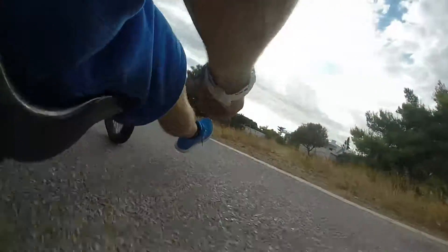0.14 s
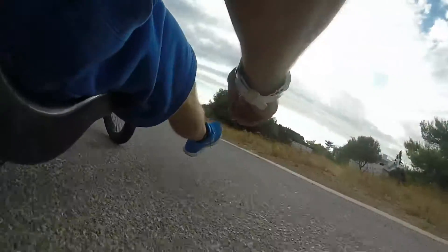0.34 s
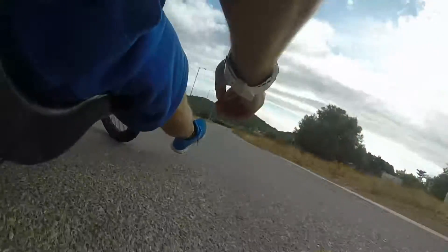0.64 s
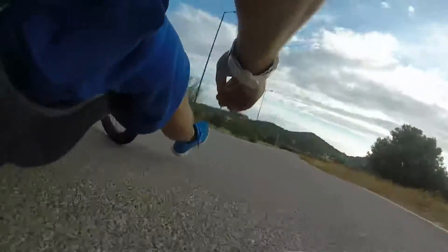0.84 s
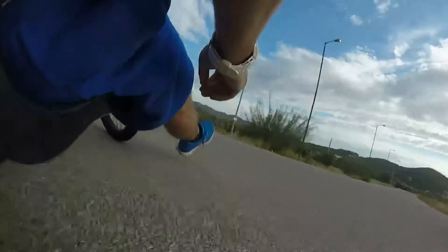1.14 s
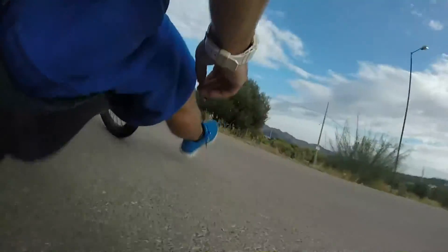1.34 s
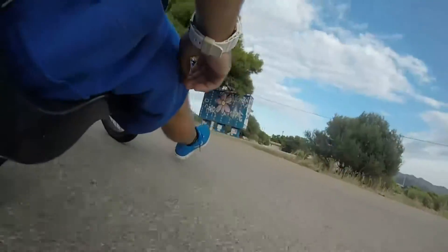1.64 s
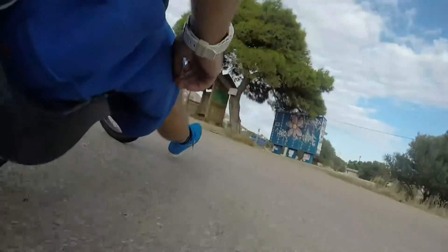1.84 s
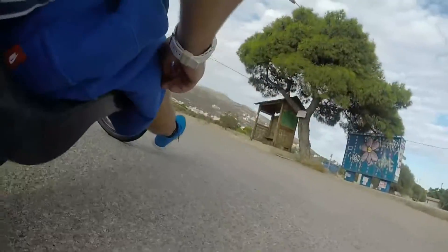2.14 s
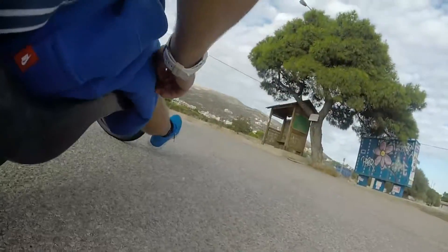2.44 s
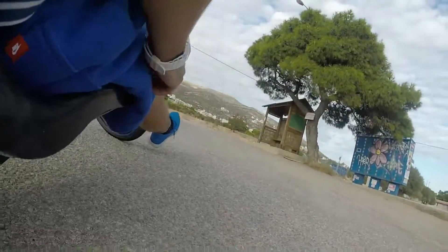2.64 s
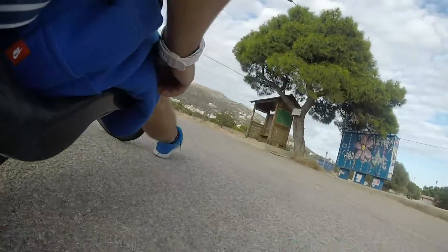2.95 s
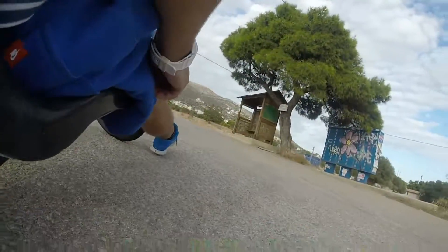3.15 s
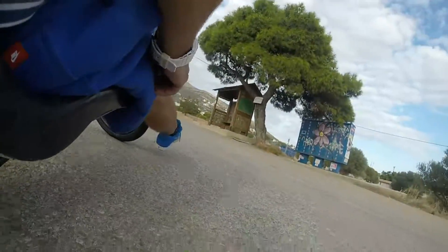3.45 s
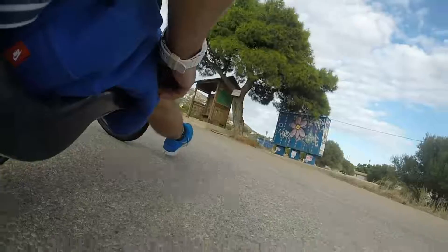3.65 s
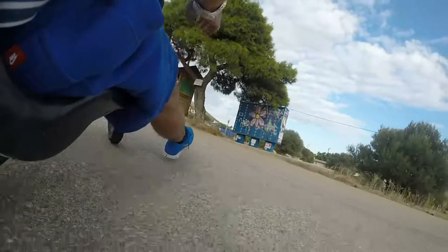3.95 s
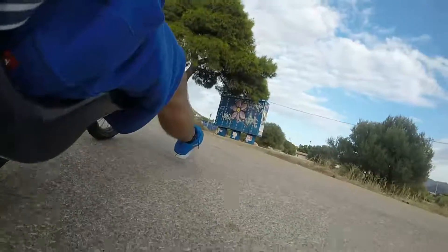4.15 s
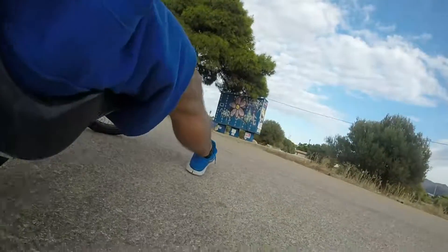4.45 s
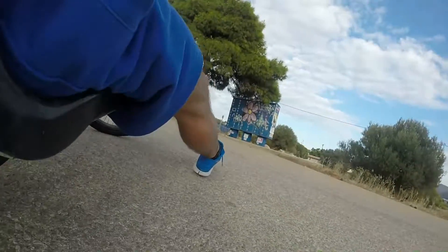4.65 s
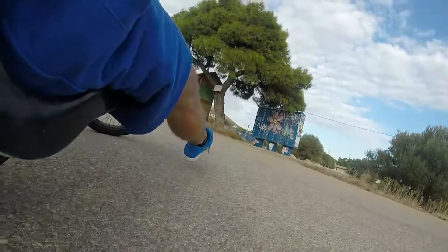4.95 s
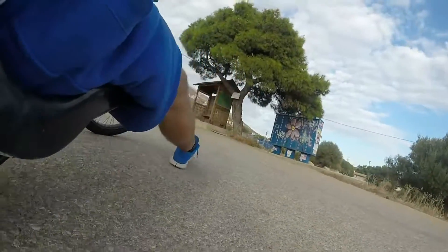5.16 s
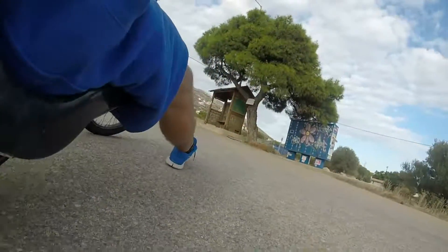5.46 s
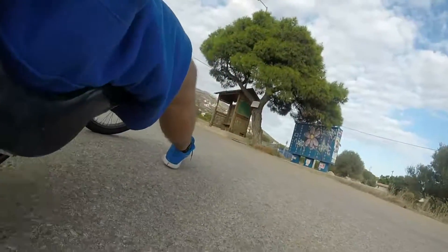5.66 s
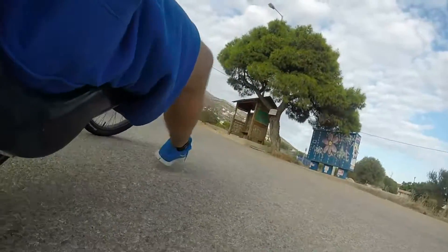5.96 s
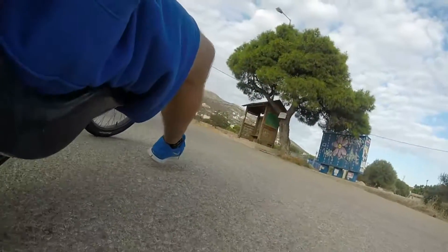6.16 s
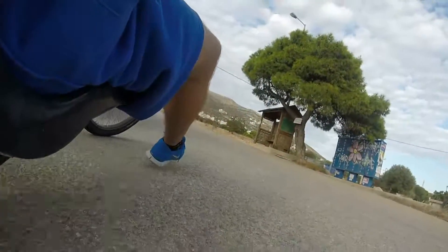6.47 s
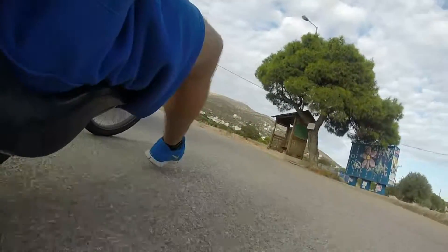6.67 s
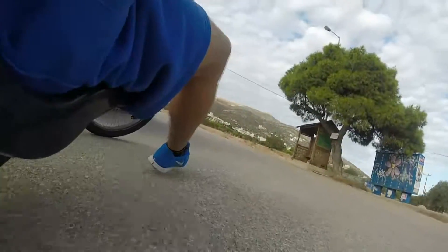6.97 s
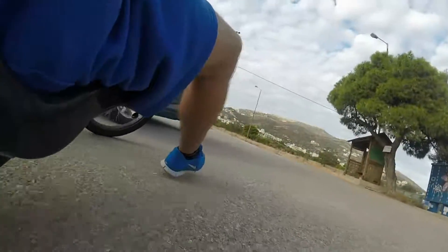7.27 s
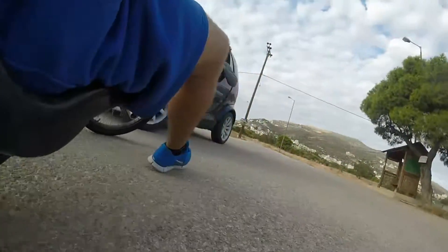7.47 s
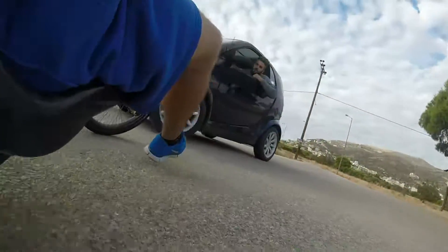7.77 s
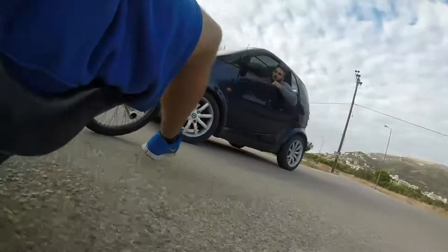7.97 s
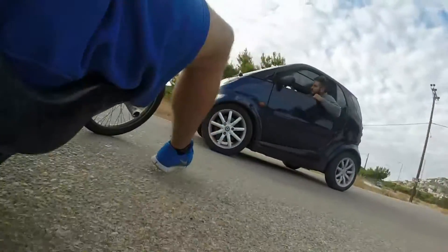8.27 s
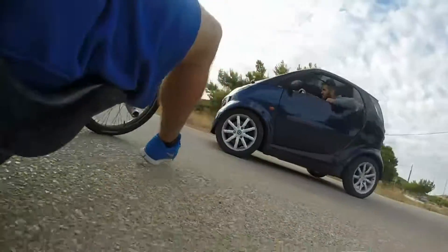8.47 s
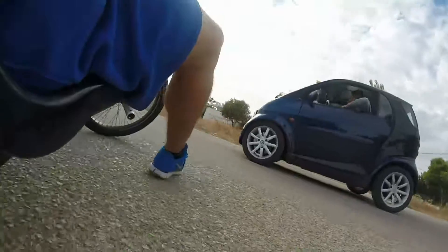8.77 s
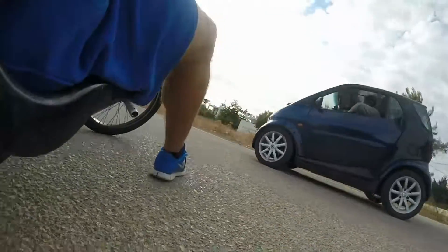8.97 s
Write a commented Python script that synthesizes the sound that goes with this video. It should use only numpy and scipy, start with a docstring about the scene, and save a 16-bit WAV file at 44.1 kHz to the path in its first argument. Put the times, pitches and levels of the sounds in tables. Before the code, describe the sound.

A trike rolls over rough asphalt, heard close through a microphone mounted on its frame. The road shakes it into a loud, deep, humming drone with a lumpy rumble. For the first 2.2 seconds a loose joint chatters harshly and slaps several times a second. Steel tubes ping at about 0.3, 1.7 and 2.2 seconds, most strongly at 1.7. From about 2.4 to 2.8 seconds the wheels run smooth and the sound almost drops out, leaving a thin whine and a faint hiss of air. By 3 seconds the drone is back, with a low wobble, crunching grit and irregular knocks and thuds from stones. It eases around 4.5 seconds and swells again just after 5. From about 7 seconds the plastic wheels scrub sideways and catch, while the joint buzzes and ticks sharply. The scraping is strongest around 8.5 seconds, and the rumble continues until about 9.

```python
"""On a slope of rough asphalt, close up: a microphone on a camera mount fixed to a rolling drift trike.
The road shakes the mount into a deep drone; at first a loose joint chatters on every swing and slaps,
and the steel tubes ring. The wheels run smooth for a moment, leaving a thin whine, then rumble again
over grit and stones while the joint buzzes and ticks. Near the end they scrub sideways.
The road reaches the microphone through the frame, over a faint hiss of air."""
import sys
import numpy as np
from scipy import signal
from scipy.fft import rfft, irfft
from scipy.io import wavfile
from scipy.ndimage import uniform_filter1d, minimum_filter1d

SR = 44100
rng = np.random.default_rng(int(sys.argv[2]) if len(sys.argv) > 2 else 0)


def output_pcm(signal):
    """Save a mono or channel-first signal as 16-bit PCM at the path in sys.argv[1].

    Samples are clipped to [-1, 1] before scaling.
    """
    pcm = np.clip(np.atleast_2d(signal).T, -1, 1) * 32767
    wavfile.write(sys.argv[1], SR, np.round(pcm).astype(np.int16))


N = 401751
TIME = np.arange(N) / SR

# Levels are relative within a table; each source sets its own gain.
# pitch of the camera mount's resonance, lower while the joint is slack: (time [s], frequency [Hz])
SWING_PITCH = [(0, 141.1), (1.0, 141.4), (1.8, 136.4), (2.18, 134.2), (2.3, 148.9), (3.5, 150),
               (5.7, 143.3), (7, 147), (9.11, 147.1)]
# how hard the road shakes that resonance: (time [s], level [dB])
DRONE_LEVEL = [(0, -11.5), (1.3, -15), (2.1, -17), (2.32, -15), (3.15, -19), (3.45, -14), (3.85, -17.5),
               (4.2, -16), (4.5, -23.5), (5.0, -20.5), (5.25, -11.5), (5.8, -18), (6.2, -15), (7.3, -12.5),
               (7.8, -9.5), (8.4, -13), (9.11, -12)]
# bite of the wheels on the road, lost while they run smooth: (time [s], gain [dB])
ROAD_BITE = [(2.195, -2.5), (2.21, -9.5), (2.28, -10.5), (2.305, 3), (2.335, -2), (2.39, -32.5),
             (2.79, -30), (2.84, -15), (2.95, -8), (3.06, -1)]
# road thunder and slow chassis wobble: (time [s], level [dB])
THUNDER_LEVEL = [(0, -22.5), (1.2, -21.5), (2.1, -19), (2.3, -34), (3.2, -28), (3.7, -27.5), (4.2, -31),
                 (4.4, -40), (5.3, -46.5), (6.3, -35), (7.4, -34.5), (8.3, -30.5), (9.11, -35)]
WOBBLE_LEVEL = [(0, -50.5), (1.2, -43), (2.3, -55), (2.45, -32.5), (2.87, -35), (3.1, -21.5), (3.6, -23),
                (3.85, -26), (5.1, -26), (5.65, -18.5), (6.3, -29), (6.85, -26.5), (7.4, -37.5),
                (8.4, -45.5), (9.11, -35)]
# bumps in the road: (time [s], swell of the drone [dB], thud [dB])
ROAD_BUMPS = [(0.368, -10, -17.5), (1.13, -33, -16), (1.23, -17, -24), (1.79, -10.5, -18),
              (2.089, -11.5, -18), (2.83, -24.5, -34.5), (2.965, -13, -28), (3.038, -16.5, -20.5),
              (3.371, -0.5, -22), (3.63, -12.5, -17.5), (3.739, -10.5, -17), (4.19, -20, -18),
              (5.07, -16, -23), (5.29, -12, -33), (5.389, -11.5, -20.5), (5.551, -6, -33.5),
              (5.82, -10.5, -21.5), (5.96, -16.5, -21), (6.19, -5.5, -10), (6.26, -22, -19.5),
              (6.539, -18, -35), (6.479, -7, -31), (6.928, -10, -32), (7.68, -1.5, -36)]
# the joint's chatter when slack and its buzz under load: (time [s], level [dB])
CHATTER_LEVEL = [(0, -32), (0.4, -35.5), (0.8, -26), (1.2, -19.5), (1.5, -22), (1.8, -26), (2.0, -33),
                 (2.1, -31.5), (2.2, -18)]
BUZZ_LEVEL = [(2.3, -60), (3.0, -77), (3.18, -59), (3.4, -77), (4.2, -74), (4.5, -90), (6.1, -80),
              (6.9, -66.5), (7.25, -55.5), (7.5, -57), (8.5, -53.5), (8.9, -56.5), (9.11, -61.5)]
# single hard slaps and sharp ticks of the joint: (time [s], level [dB])
JOINT_SLAPS = [(0.013, -8), (0.077, -27), (0.109, -7.5), (0.147, -8), (0.22, -6), (0.251, -5),
               (0.362, -11.5), (0.394, -9.5), (0.448, -8), (0.501, -7), (0.582, -7.5), (0.613, -6.5),
               (0.647, -6.5), (0.67, -11), (0.76, -5), (0.803, -5.5), (0.872, -5.5), (0.9, -7),
               (0.93, -7.5), (1.005, 0), (1.031, -8), (1.07, -8.5), (1.156, -6.5), (1.241, -5), (1.349, -8),
               (1.372, -23), (1.41, 4), (1.441, -6), (1.485, -12), (1.583, -9), (1.7, -23), (1.765, -3.5),
               (1.813, -8.5), (1.872, -3.5), (2.037, -9), (2.089, -8), (2.127, -6.5)]
JOINT_TICKS = [(0.9974, -18), (1.0335, -17.5), (1.4036, -33), (1.442, -25), (3.2355, -32), (3.447, -34),
               (3.488, -40.5), (3.6371, -36), (3.771, -34), (3.9586, -39), (4.187, -37), (4.233, -38.5),
               (5.3575, -40), (6.2657, -36.5), (6.5255, -35.5), (6.668, -34.5), (6.9282, -36),
               (7.1436, -29.5), (7.212, -29), (7.2466, -24.5), (7.3718, -40), (7.449, -29.5),
               (7.7727, -25.5), (7.861, -26.5), (8.0425, -24.5), (8.1403, -22), (8.1736, -23.5),
               (8.2038, -21), (8.234, -23.5), (8.3187, -29), (8.3864, -29), (8.4456, -34), (8.5245, -30),
               (8.554, -22), (8.6956, -28)]
# wheels crunching on grit, scrubbing sideways, whining on smooth road: (time [s], level [dB])
GRIT_LEVEL = [(0, -48), (2.3, -36.5), (3.0, -45), (3.4, -36), (3.8, -46.5), (4.2, -41.5), (4.6, -48.5),
              (5.3, -40), (6.3, -40), (7.2, -38.5), (8.2, -39), (9.11, -43.5)]
SCRUB_LEVEL = [(6.9, -64), (7.7, -45), (8.35, -37), (8.75, -45), (9.11, -43)]
WHINE_LEVEL = [(2.3, -68), (2.38, -63.5), (2.52, -52.5), (2.62, -59.5), (2.95, -63), (3.2, -92)]
# the scrubbing wheels catch: (time [s], level [dB])
WHEEL_CATCHES = [(6.935, -32.5), (7.215, -31.5), (7.25, -39), (7.36, -47), (8.045, -30), (8.225, -35),
                 (8.32, -36), (8.39, -31), (8.52, -23.5), (8.59, -23), (8.7, -28)]
# larger stones and pits knock the frame: (time [s], level [dB], share of high clank [dB])
STONE_KNOCKS = [(3.0805, -19, -5.5), (3.3484, -20.5, -19), (3.3729, -12.5, -8), (3.4102, -24, -12),
                (3.7728, -32, -18), (4.167, -22, -15), (4.207, -29, -22), (4.4445, -27.5, -16),
                (4.6108, -27.5, -9), (4.819, -26, -9), (4.8937, -24.5, -25), (4.984, -19.5, -1.5),
                (5.0694, -17, -9), (5.2022, -13, -2.5), (5.265, -23, -14), (5.3212, -13, -10.5),
                (5.5262, -19.5, -8.5), (5.691, -16, -16.5), (5.7916, -22, -9.5), (5.8521, -19.5, -10),
                (6.1623, -20, -15), (6.3568, -22, -20), (6.4621, -18.5, -15), (6.6536, -21, -17),
                (6.791, -26, -12), (7.0878, -22, -13.5), (7.3573, -14, -16), (7.4699, -23.5, -9.5),
                (7.8027, -26, -13.5), (7.93, -18.5, -13), (8.1246, -24, -16), (8.5192, -32, -29),
                (8.556, -19, -13), (8.7004, -26, -7)]
# blows that leave the steel ringing: (time [s], level [dB])
TUBE_PINGS = [(0.264, -9.5), (1.69, 3.5), (2.2, -5.5)]
# ring of the steel tubes: (frequency [Hz], level [dB], time to fall 60 dB [s])
TUBE_MODES = [(1540, -46, 2), (1660, -66.5, 1.2), (1690, -22.5, 0.86), (2040, -21.5, 0.13),
              (2020, -29.5, 0.12)]
# resonances of the frame with its wheels, and of the whine: (frequency [Hz], width [Hz], level [dB])
FRAME_MODES = [(494, 25, 0), (554, 89, -1.5), (627, 62, 7.5), (1068, 88, -4.5), (1191, 63, 0),
               (1545, 95, -1), (1660, 28, 4.5), (1775, 80, -1), (2214, 89, -8), (2348, 32, -5),
               (2547, 150, -4), (2690, 150, -5.5), (2930, 90, -11.5), (3547, 72, -23.5), (4550, 160, -27),
               (6150, 310, -52.5), (7440, 200, -35)]
WHEEL_MODES = [(930, 25, -19), (1050, 100, -3), (1120, 50, -10.5), (2680, 3, -0.5), (2755, 14, -8.5)]
# spectra of the resonance above the drone, the thunder and the wobble: (frequency [Hz], level [dB])
UPPER_SPECTRUM = [(190, -14), (206, -4.5), (218, 2), (232, -6.5), (255, -18)]
THUNDER_SPECTRUM = [(45, -9), (60, -3.5), (85, 1.5), (120, 3.5), (190, 0), (260, 3), (320, -2), (380, -22)]
WOBBLE_SPECTRUM = [(14, -11.5), (21, 7), (33, 10), (45, -7), (65, -21.5)]
# spectra of the joint's contacts: (frequency [Hz], level [dB])
CHATTER_SPECTRUM = [(220, -2.5), (340, 4), (480, 0.5), (750, -3.5), (1030, 0), (1350, -6.5), (1510, -3),
                    (1850, -8), (2400, -4.5), (2780, -9.5), (3400, -21), (4800, -26.5), (6100, -31.5),
                    (8400, -40.5), (11500, -57.5)]
BUZZ_SPECTRUM = [(400, 8), (900, 8.5), (1800, -3), (3200, -1), (4100, -5.5), (4700, -4.5), (6200, 0),
                 (7600, -17), (8300, -16.5), (8900, -20.5), (12000, -26.5)]
TICK_SPECTRUM = [(500, 9), (3000, -10.5), (4100, -5.5), (6000, -4), (8600, -10.5), (9700, -2),
                 (11500, -5.5), (12800, -13), (14500, -34)]
# spectra of the scrubbing wheels and the air: (frequency [Hz], level [dB])
SCRUB_SPECTRUM = [(350, 0.5), (600, 6.5), (800, 0), (1050, 0), (1400, -13), (3000, -11)]
AIR_SPECTRUM = [(300, 4.5), (3000, -5), (4000, -19), (7000, -19.5), (13000, -46)]

SLACK_END_S, SMOOTH_START_S, SMOOTH_END_S = 2.203, 2.37, 2.6
CATCH_RISE_S, CATCH_DECAY_S = 0.018, 0.0082


def mount_swing(rolling, width_hz, steady):
    """Road kicks make the mount's resonance swell and slip in phase; on smooth road it rings freely."""
    hz, = in_time(SWING_PITCH)
    kicks = steady + rolling * (drift(width_hz) + 1j * drift(width_hz))
    turns = np.cumsum(hz) / SR + np.unwrap(np.angle(kicks)) / (2 * np.pi)
    swing = evened(np.abs(kicks), 0.07)
    return turns, swing


def road_rumble(turns, swing, rolling):
    """Deep drone of the road-shaken camera mount, with an upper resonance and lumpy road thunder."""
    drone_db, bite_db, thunder_db = in_time(DRONE_LEVEL) + in_time(ROAD_BITE) + in_time(THUNDER_LEVEL)
    swell, thud = bumps()
    drone_gain = np.hypot(from_db(ringing_on(drone_db + bite_db)), swell)
    drone = drone_gain * np.sqrt(2) * swing * np.sin(2 * np.pi * turns)
    road = .9 + small_stones(per_s=24, decay_s=.012)
    upper_db = -22.5 + 0.17 * (drone_db - drone_db.mean()) + bite_db
    upper_gain = np.hypot(from_db(upper_db) * np.maximum(rolling, .2), 1.2 * thud)
    upper = upper_gain * evened(coloured(road * white(), UPPER_SPECTRUM), 0.13)
    trim_db = -3.5 * (TIME < SLACK_END_S)   # the thunder is turned down a little while the joint chatters
    thunder_gain = from_db(trim_db + 6) * np.hypot(from_db(thunder_db + bite_db), 0.49 * thud)
    thunder = thunder_gain * evened(coloured(road * white(), THUNDER_SPECTRUM), 0.11)
    return drone + upper + thunder


def bumps(rise_s=0.0047, decay_s=.04):
    """Two envelopes: bumps and slaps swell the drone; they, the knocks and the catches add thuds."""
    swell = swells([(s, db) for s, db, _ in ROAD_BUMPS], rise_s, decay_s)
    thud = swells([(s, db) for s, _, db in ROAD_BUMPS], rise_s, decay_s)
    slaps, knocks, catches = (swells(rows, rise_s=.003, decay_s=0.017)
                              for rows in (JOINT_SLAPS, STONE_KNOCKS, WHEEL_CATCHES))
    blows = from_db(-17.5) * slaps + from_db(-9) * knocks + from_db(4) * catches
    return np.hypot(swell, from_db(-8.5) * np.minimum(slaps, .5)), np.hypot(thud, blows)


def chassis_wobble(rolling, free_hz=22.5):
    """The chassis wobbles at random on rough road and evenly on smooth road."""
    driven = evened(coloured(white(), WOBBLE_SPECTRUM), 0.045)
    free = np.sqrt(2) * np.sin(2 * np.pi * free_hz * TIME)
    return from_db(in_time(WOBBLE_LEVEL)[0] + 2.5) * (rolling * driven + (1 - rolling) * free)


def slack_joint(turns, swing):
    """The slack joint rattles against its stop: harsh chatter, bright ticking and hard slaps."""
    slack = np.clip((SLACK_END_S - TIME) / 0.0068, 0, 1)
    hard = contacts(turns, swing, back_db=-13, spread_db=1, decay_s=0.0028, grain=0.19, steep=0.86)
    stutter_db = 4.7 * np.clip(drift(27), -2.5, 1.2)
    fits = from_db(-14) * swells(JOINT_SLAPS, rise_s=0.0016, decay_s=0.017)   # chatter after each slap
    force = np.hypot(from_db(in_time(CHATTER_LEVEL)[0] + stutter_db), fits)
    chatter = force * evened(coloured(hard, CHATTER_SPECTRUM), 0.044)
    sharp = contacts(turns, swing, back_db=-16, spread_db=16, decay_s=0.0013, grain=0.16, steep=0.33)
    ticking = from_db(-40.5) * force ** 0.23 * evened(coloured(sharp, TICK_SPECTRUM), 0.011)
    slaps = hits(JOINT_SLAPS, CHATTER_SPECTRUM, decay_s=0.0032, grain=0.28, gain_db=-2, rebound_db=-5)
    return slack * (chatter + ticking) + slaps


def loaded_joint(turns, swing):
    """Under load the joint only buzzes and ticks; a stronger buzz has more sharp contact in it."""
    flicker_db = 5.5 * np.clip(drift(20), -2.5, 1.5)
    force = from_db(in_time(BUZZ_LEVEL)[0] + in_time(ROAD_BITE)[0] + flicker_db)
    force += from_db(-20) * swells(WHEEL_CATCHES, CATCH_RISE_S, CATCH_DECAY_S)
    light = contacts(turns, swing, back_db=-4.5, spread_db=-1, decay_s=0.0011, grain=0.27, steep=2.5)
    sharp = contacts(turns, swing, back_db=-24.5, spread_db=8, decay_s=0.00026, grain=0.18, steep=3.9)
    sharp_share = np.minimum((force / from_db(-39)) ** 1.3, 1)
    buzz = evened(coloured(light, BUZZ_SPECTRUM), 0.025)
    buzz += sharp_share * evened(coloured(sharp, TICK_SPECTRUM), 0.017)
    ticks = hits(JOINT_TICKS, TICK_SPECTRUM[1:], decay_s=0.00088, grain=0.25, gain_db=-1,
                 rebound_db=-8.5, edge=tick_edge)
    return (TIME > SLACK_END_S) * from_db(8.5) * force * buzz + ticks


def contacts(turns, swing, back_db, spread_db, decay_s, grain, steep):
    """The joint hits its stop once a swing, and more softly on the way back; wide swings hit harder."""
    half_turn = np.floor(2 * turns + .1 * drift(90))
    touch = np.diff(half_turn, prepend=half_turn[0]) > 0
    strength_db = back_db * (1 - half_turn % 2) + spread_db * np.clip(white(), -2, 1.5)
    clicks = touch * swing ** steep * from_db(strength_db)
    return clicks + grain * dying_away(clicks, decay_s) * white()


def hits(rows, spectrum, decay_s, grain, gain_db, rebound_db, edge=None):
    """Single blows of the joint, each rebounding a swing later; edge maps level to a treble limit."""
    out, body = np.zeros(N), response(spectrum)
    for s, db in rows:
        pulse = softened(body, edge(db)) if edge else body
        swing_s = 1 / np.interp(s, *np.transpose(SWING_PITCH))
        for onset_s, level_db in (s, db), (s + swing_s, db + rebound_db):
            add(out, onset_s, signal.fftconvolve(crunch(decay_s, grain), pulse), level_db + gain_db)
    return out


def tick_edge(db, hard_db=-19.5, hard_hz=12000, db_per_octave=9):
    """Treble limit of a tick in Hz: lighter ticks are duller."""
    return hard_hz * 2 ** ((db - hard_db) / db_per_octave)


def wheel_crunch():
    """Grit and pebbles under the wheels rattle the frame's resonances."""
    pebbles = 1 + small_stones(per_s=42, decay_s=.005)
    rattle = frame_ring(grit(per_s=3000, clump_db=0.5) * pebbles, tilt_db_per_octave=-2.3)
    return from_db(in_time(GRIT_LEVEL)[0] + in_time(ROAD_BITE)[0]) * evened(rattle, 0.42)


def wheel_scrub(start_s=6.8):
    """The wheels slide sideways over the grit and catch now and then."""
    sideways = np.clip((TIME - start_s) / 0.11, 0, 1)
    force = from_db(in_time(SCRUB_LEVEL)[0] + 2 * drift(7.1))
    force += swells(WHEEL_CATCHES, CATCH_RISE_S, CATCH_DECAY_S)
    return sideways * force * evened(coloured(grit(per_s=2500, clump_db=7), SCRUB_SPECTRUM), 0.077)


def wheel_knocks():
    """Stones and hops knock the frame; the plastic wheels soften each blow."""
    out = np.zeros(N)
    for s, db, share_db in list(STONE_KNOCKS) + hops():
        blow = softened(crunch(decay_s=0.0056, grain=0.31), edge_hz=5500)
        knock = frame_ring(blow, tilt_db_per_octave=0.46, clank_db=1.3 * (share_db + 10), scatter_db=3)
        add(out, s, knock, db + 1)
    return out


def hops(count=90, start_s=4.2, pace_s=.068):
    """Rows of light knocks: the wheels hop at an uneven pace between the larger stones."""
    late, softness, clank = rng.standard_normal((count, 3)).T
    times = start_s + pace_s * (np.arange(count) + 0.27 * late)
    rows = zip(times, -30 - np.minimum(softness, 1.5), -15 + 3 * clank)
    stone_times = np.array(STONE_KNOCKS)[:, 0]
    return [row for row in rows if row[0] < TIME[-1] and np.abs(stone_times - row[0]).min() > pace_s / 2]


def frame_ring(force, tilt_db_per_octave, clank_db=0, scatter_db=0):
    """The frame's modes in parallel; each contact point shares its force among them in its own way."""
    out, chance_db = 0, scatter_db * rng.uniform(-1.9, 1, len(FRAME_MODES))
    for k, (hz, width, db) in enumerate(FRAME_MODES):
        clank_share = (hz > 2000) * (1 if hz < 3200 else .7)
        gain = from_db(db + chance_db[k] + tilt_db_per_octave * np.log2(hz / 1700) + clank_db * clank_share)
        out = out + (-1) ** k * gain * resonance(force, hz, width)
    return out


def steel_tubes():
    """The struck tubes ring on as dying sine tones."""
    out, age = np.zeros(N), TIME[:SR]
    ring = sum(from_db(db - 60 * age / t60) * np.sin(2 * np.pi * hz * age) for hz, db, t60 in TUBE_MODES)
    for s, db in TUBE_PINGS:
        add(out, s, ring, db - 22.5)
    return out


def wheel_whine():
    """Light rubbing makes a wheel sing thinly."""
    tones = sum(from_db(db) * evened(resonance(resonance(white(), hz, width), hz, 3 * width), 0.07)
                for hz, width, db in WHEEL_MODES)
    return from_db(in_time(WHINE_LEVEL)[0]) * tones


def air():
    """A faint, steady hiss of air at the microphone."""
    return from_db(-65) * evened(coloured(white(), AIR_SPECTRUM), .5)


def grit(per_s, clump_db):
    """Grains of asphalt under a hard wheel, arriving in clumps."""
    return white() * (rng.random(N) < per_s / SR) * from_db(clump_db * np.clip(drift(30), -2, 2))


def small_stones(per_s, decay_s):
    """Force of random small stones: each raises it at once and lets it die away; mean 1."""
    force = dying_away(rng.random(N) < per_s / SR, decay_s)
    return force / force.mean()


def crunch(decay_s, grain, size=2048):
    """One contact: a click and a quickly dying spray of smaller ones."""
    burst = grain * rng.standard_normal(size) * np.exp(-np.arange(size) / (decay_s * SR))
    burst[0] += 1
    return burst


def swells(rows, rise_s, decay_s):
    """Envelope of (time [s], level [dB]) events: each rises quickly and dies away."""
    out, age = np.zeros(N), np.arange(SR // 2) / SR
    shape = np.minimum(age / rise_s, 1) * np.exp(-np.maximum(age - rise_s, 0) / decay_s)
    for s, db, *_ in rows:
        add(out, s - rise_s / 2, shape, db)
    return out


def ringing_on(db, fall_db_per_s=129):
    """A level that can fall no faster than the mount rings down."""
    fall = fall_db_per_s * TIME
    return np.maximum.accumulate(db + fall) - fall


def dying_away(kicks, decay_s):
    """Give each kick an exponential tail."""
    return signal.lfilter([1], [1, -np.exp(-1 / (decay_s * SR))], kicks + 1e-18)


def resonance(x, hz, width_hz):
    """One resonance with gain 1 at its peak."""
    r, w = np.exp(-np.pi * width_hz / SR), 2 * np.pi * hz / SR
    return signal.lfilter([0, 2 * (1 - r) * np.sin(w)], [1, -2 * r * np.cos(w), r * r], x)


def softened(x, edge_hz):
    """A softer contact loses its treble."""
    return signal.sosfilt(signal.butter(2, min(edge_hz, .45 * SR), fs=SR, output="sos"), x)


def response(spectrum, size=8192):
    """Minimum-phase impulse response of a spectrum that falls steeply beyond its ends; peak 1."""
    hz, db = np.transpose(spectrum)
    octave = np.log2(np.maximum(np.arange(size // 2 + 1) * SR / size, 1))
    known = np.log2(np.sort(hz))
    beyond = np.abs(octave - np.clip(octave, known[0], known[-1]))
    gain_db = np.maximum(np.interp(octave, known, db) - 36 * beyond, -130)
    cepstrum = irfft(np.log(from_db(gain_db)))
    cepstrum[1:size // 2] *= 2
    cepstrum[size // 2 + 1:] = 0
    pulse = irfft(np.exp(rfft(cepstrum)))
    return pulse / np.abs(pulse).max()


def coloured(x, spectrum):
    """Pass a sound through a spectrum."""
    return signal.oaconvolve(x, response(spectrum))[:N]


def evened(x, span_s):
    """Hold the rms at 1 over the given span; faster detail stays."""
    size = max(int(span_s * SR), 8)
    power = uniform_filter1d(uniform_filter1d(x * x, size), size)
    return x / np.sqrt(np.abs(power) + 1e-6 * np.mean(x * x))


def drift(rate_hz, step=40):
    """Slow random wander with a spread of 1."""
    r = np.exp(-2 * np.pi * rate_hz * step / SR)
    slow = signal.lfilter([1], [1, -2 * r, r * r], rng.standard_normal(N // step + 2002))[2000:]
    return np.interp(np.arange(N) / step, np.arange(len(slow)), slow / slow.std())


def add(out, s, sound, db):
    """Lay a sound into a track at the given time and peak level."""
    start = max(int(s * SR), 0)
    part = sound[:max(N - start, 0)]
    out[start:start + len(part)] += from_db(db) * part / np.abs(sound).max()


def in_time(rows):
    """List of a curve's value columns, each at every sample."""
    s, *columns = np.transpose(rows)
    return [np.interp(TIME, s, column) for column in columns]


def white():
    """Fresh white noise."""
    return rng.standard_normal(N)


def from_db(db):
    """Decibels to gain."""
    return 10 ** (np.asarray(db) / 20)


def scene():
    """Rumble, joint, wheels, tubes and air, summed in mono at the microphone."""
    # 1 on rough road, 0 while the wheels run smooth
    rolling = np.clip(np.maximum((SMOOTH_START_S - TIME) / 0.081, (TIME - SMOOTH_END_S) / 0.026), 0, 1)
    turns, swing = mount_swing(rolling, width_hz=16, steady=1.3)
    hiss = air()
    joint = slack_joint(turns, swing) + loaded_joint(turns, swing)
    rumble = road_rumble(turns, swing, rolling) + chassis_wobble(rolling)
    wheels = wheel_crunch() + wheel_scrub() + wheel_knocks() + wheel_whine()
    return (rumble + joint + wheels + steel_tubes() + hiss)[None]


def record(dry):
    """A look-ahead limiter holds the peaks; the top is cut at 15.8 kHz."""
    needed = np.minimum(1, .8 / (np.abs(dry) + 1e-9))
    held = minimum_filter1d(needed, size=801)
    gain = uniform_filter1d(uniform_filter1d(held, size=401), size=401)
    return signal.sosfilt(signal.ellip(8, .3, 70, 15800, fs=SR, output="sos"), dry * gain)


dry = scene()
out = record(dry)
output_pcm(out)
```